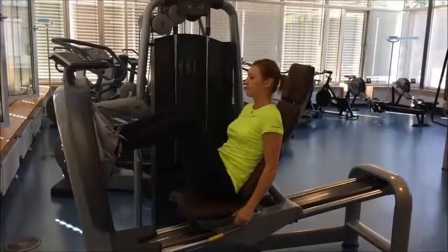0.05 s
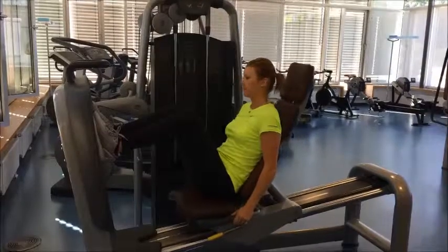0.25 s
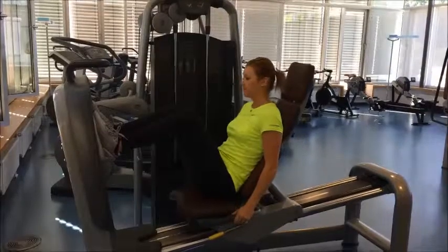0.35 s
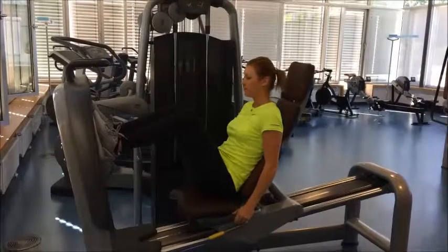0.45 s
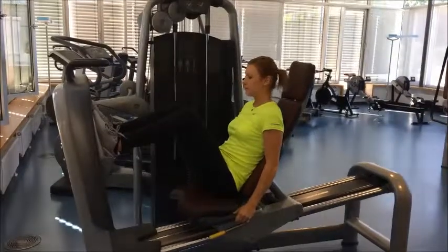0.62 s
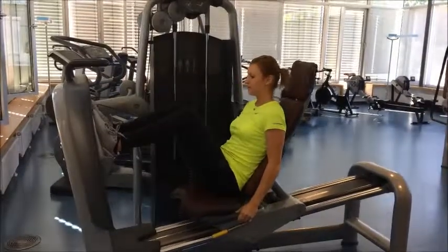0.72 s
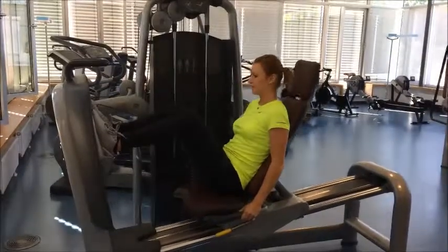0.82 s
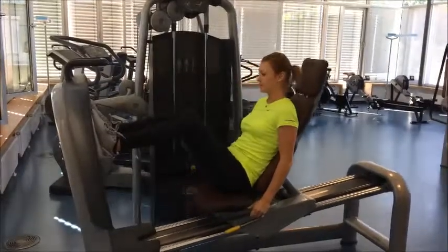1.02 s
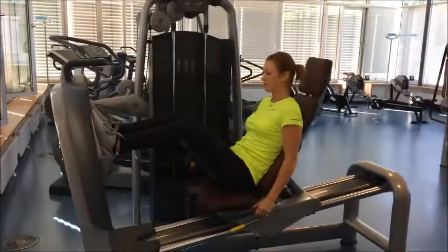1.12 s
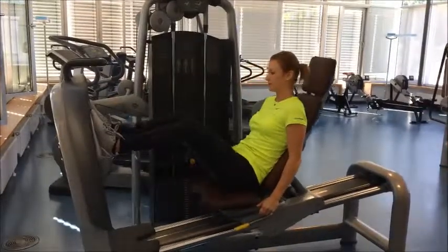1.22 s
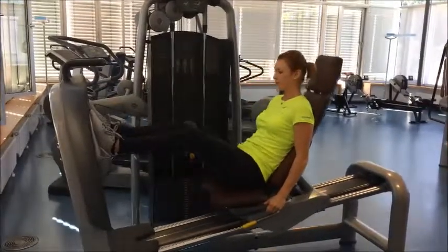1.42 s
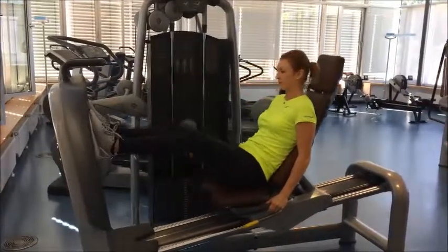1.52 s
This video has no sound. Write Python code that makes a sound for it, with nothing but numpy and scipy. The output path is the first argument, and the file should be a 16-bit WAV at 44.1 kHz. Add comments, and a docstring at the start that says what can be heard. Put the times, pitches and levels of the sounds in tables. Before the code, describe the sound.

Steel weight plates clank and ring on a leg press machine in a reverberant gym hall

```python
"""A leg press in a gym hall, in mono: low room rumble and the seat carriage on its rails are there from the start,
both made of coloured noise. The weight stack is then picked up with a clattering clank and knocks on: damped sines
ring the steel plates, noise and sines rattle the frame, and noise bursts crack. The housing booms in low modes,
a small steel part pings, and the hall answers with noise tails. Late on, the rolling swells and the carriage
bumps softly. The microphone path thins the deep bass and stops the extreme treble."""
import sys
import numpy as np
from scipy import signal
from scipy.fft import rfft, irfft, next_fast_len
from scipy.io import wavfile
from scipy.ndimage import uniform_filter1d

SR = 44100
rng = np.random.default_rng(int(sys.argv[2]) if len(sys.argv) > 2 else 0)


def int16_out(signal):
    """Quantize to a 16-bit WAV file."""
    q = np.round(np.clip(np.atleast_2d(signal).T, -1, 1) * 32767)
    wavfile.write(sys.argv[1], SR, q.astype(np.int16))


N = 68355


def amp(db):
    """Decibels to gain."""
    return 10 ** (np.asarray(db) / 20)


def unit(x):
    """Scale to rms 1."""
    return x / np.sqrt(np.mean(x ** 2) + 1e-20)


def along(points, hz):
    """Read (f/Hz, value) points at hz, on a log frequency axis."""
    f, value = np.transpose(points)
    return np.interp(np.log(hz + 1), np.log(f + 1), value)


def clock():
    """Time of every sample, in seconds."""
    return np.arange(N) / SR


def delayed(x, s):
    """x starting at time s."""
    return np.pad(x, (max(round(s * SR), 0), 0))[:N]


def filtered(x, response):
    """x with its spectrum multiplied by a response of frequency."""
    size = next_fast_len(N + SR // 2)
    spectrum = rfft(x, size) * response(np.fft.rfftfreq(size, 1 / SR))
    return irfft(spectrum, size)[:N]


def noise(spectrum):
    """Coloured noise of rms 1."""
    white = rng.standard_normal(N)
    return unit(filtered(white, lambda hz: amp(along(spectrum, hz))))


def fade(t, t60):
    """Exponential decay, 60 dB in t60 seconds."""
    return np.exp(-np.log(1000) * t / np.maximum(t60, 1e-3))


def onset(rise_s):
    """Smooth exponential rise from silence with time constant rise_s."""
    return 1 - np.exp(-clock() / rise_s)


def dying(x, t60s):
    """Let each frequency of x die at its own speed."""
    hz, t, bins = signal.stft(x, SR, nperseg=256)
    bins = bins * fade(t, along(t60s, hz)[:, None])
    return signal.istft(bins, SR, nperseg=256)[1][:N]


def mode(hz, t60, blur_hz):
    """One damped sine whose phase wanders smoothly, widening its line to blur_hz."""
    t = clock()
    steps = uniform_filter1d(np.cumsum(rng.standard_normal(N)), size=24)
    wander = steps * np.sqrt(2 * np.pi * abs(blur_hz) / SR)
    return np.sin(2 * np.pi * (hz * t + rng.random()) + wander) * fade(t, t60)


def modes(table, blur_hz):
    """Sum of the damped sines in a table of (f/Hz, level/dB, t60/s)."""
    return sum(amp(db) * mode(hz, t60, blur_hz) for hz, db, t60 in table)


# Colour of the room rumble: (f/Hz, relative level/dB)
ROOM_COLOUR = [(15, -38), (25, -79), (52, -0.5), (93, -3), (160, 0.5), (267, -14), (648, -19.5), (919, -18),
               (1620, -25.5), (1800, -21.5), (2840, -32), (14300, -49.5), (15500, -44)]
ROOM_DB = -57
DRONE_HZ, DRONE_WIDTH_HZ, DRONE_DB = 167.7, 23, -55


def room():
    """Steady broadband rumble, plus noise through one narrow low resonance, which wavers."""
    def resonance(f):
        damping = 1j * f * DRONE_WIDTH_HZ
        return damping / (DRONE_HZ ** 2 - f ** 2 + damping)

    rumble = amp(ROOM_DB) * noise(ROOM_COLOUR)
    drone = unit(filtered(rng.standard_normal(N), resonance))
    return rumble + amp(DRONE_DB) * drone


# Loudness of the carriage rolling: (t/s, level/dB)
ROLL_LEVEL = [(0, -61), (.7, -62.5), (1.0, -58), (1.28, -57.5), (1.55, -60.5)]
# Colour of rollers on the rails: (f/Hz, relative level/dB)
RAIL_COLOUR = [(40, 15), (120, -11.5), (330, 7), (550, -2), (900, 0.5), (1700, -6), (3000, -28),
               (6000, -38), (15000, -32)]
# Soft bumps of the carriage: (t/s, level/dB)
BUMPS = [(1.25, -60.5)]
# Colour of a bump: (f/Hz, relative level/dB)
BUMP_COLOUR = [(200, -8), (2300, 11), (4200, 1), (8000, -23), (15000, -33)]
BUMP_RISE_S, BUMP_T60_S = .004, 0.11


def carriage():
    """Rollers rumble on the rails as noise of changing level, with a soft bump."""
    t = clock()
    out = amp(np.interp(t, *np.transpose(ROLL_LEVEL))) * noise(RAIL_COLOUR)
    envelope = onset(BUMP_RISE_S) * fade(t, BUMP_T60_S)
    for s, db in BUMPS:
        out += amp(db) * delayed(envelope * noise(BUMP_COLOUR), s)
    return out


# Reverberation time of the hall: (f/Hz, t60/s)
HALL_T60 = [(100, 1.93), (500, 0.68), (2500, 0.91), (6000, 0.68), (10500, 0.49), (14500, 0.57)]


def in_hall(x, wet_db):
    """The direct sound plus a fresh reverberant tail of decaying noise."""
    tail = dying(rng.standard_normal(N), HALL_T60)
    tail = tail / np.linalg.norm(tail)
    return x + amp(wet_db) * signal.fftconvolve(x, tail)[:N]


# Plate modes, before each contact's own tilt and damping: (f/Hz, level/dB, free t60/s)
PLATE_MODES = [(1477.7, 1, 0.75), (1509, -9.5, 0.52), (1588, -8, 0.44), (1810, -12.5, 0.59),
               (2170, -2.5, 0.27), (2316, -6, 0.47), (2305, -1, 0.71), (2309, -7.5, 0.72), (2632, -8, 0.51),
               (2857, -13.5, 0.33), (3636, -14, 0.81), (4347, -9.5, 0.71), (5330, -14.5, 0.67),
               (5870, -1, 0.21), (6572, -11, .6), (6670, -8.5, 0.35), (7310, -9.5, 0.26), (9500, -14, 0.3),
               (10720, -14, 0.44)]
# Pitches at which each contact sets its ring level: low, middle, high (f/Hz)
RING_BANDS_HZ = [1470, 2320, 5880]
PLATE_DETUNE = .007  # spread of the neighbour's pitch, as a share
PLATE_SCATTER_DB, NEIGHBOUR_DB, PLATE_BLUR_HZ = .5, -5, 8
CLANG_T60_S, CLANG_BLUR_HZ = 0.067, 109  # a harsher ring while the plates still chatter
ROCK_PER_S, ROCK_DEPTH = 18.1, 0.35  # the struck plates rock, so their ring pulses
RING_ATTACK_S = 0.00064


def plates(band_db, clang_db, length):
    """A brief clang, then the struck plate and a slightly detuned neighbour ring and beat."""
    ring = np.zeros(N)
    rock = 1 - np.clip(ROCK_DEPTH, 0, 1) * np.cos(2 * np.pi * ROCK_PER_S * clock())
    for hz, db, t60 in PLATE_MODES:
        tilt_db = np.interp(np.log(hz), np.log(RING_BANDS_HZ), band_db)
        level_db = db + tilt_db + PLATE_SCATTER_DB * rng.standard_normal()
        struck = mode(hz, t60 * length, PLATE_BLUR_HZ)
        neighbour_hz = hz * (1 + PLATE_DETUNE * rng.standard_normal())
        neighbour = mode(neighbour_hz, t60 * length, PLATE_BLUR_HZ)
        clang = mode(hz, CLANG_T60_S, CLANG_BLUR_HZ)
        pulsing = rock * (struck + amp(NEIGHBOUR_DB) * neighbour)
        ring += amp(level_db) * (pulsing + amp(clang_db) * clang)
    return ring * onset(RING_ATTACK_S)


# The frame's dense rattle: colour (f/Hz, relative level/dB), then decay (f/Hz, t60/s)
FRAME_COLOUR = [(200, -21.5), (330, -7), (430, 1), (540, -24.5), (700, -2), (1100, 4.5), (1320, -15),
                (1600, -2), (1900, -10.5), (2300, -12), (3000, -24.5), (4400, -23), (8000, -28),
                (15000, -27)]
FRAME_T60 = [(300, 0.24), (1000, 0.13), (2500, 0.32), (8000, 0.15)]
# The frame's clearest modes: (f/Hz, level/dB, t60/s)
FRAME_MODES = [(552.2, -22.5, 0.59), (687.8, -14.5, 0.38), (738, -18, 0.89), (949, -15.5, 0.67),
               (1044, -17, 0.76), (1124, -13.5, 0.36), (1174, -14.5, 0.46)]
FRAME_BLUR_HZ = 6.3


def frame():
    """A short dense rattle of noise over a few ringing modes."""
    return dying(noise(FRAME_COLOUR), FRAME_T60) + modes(FRAME_MODES, FRAME_BLUR_HZ)


# The crack of steel on steel: colour (f/Hz, relative level/dB), then decay (f/Hz, t60/s)
CRACK_COLOUR = [(300, -18), (2000, 19.5), (3200, -1), (6000, -1.5), (8500, -3.5), (10500, -1), (14000, -8),
                (15500, -8)]
CRACK_T60 = [(1000, 0.18), (6000, 0.27), (15000, 0.17)]


def crack():
    """Steel on steel: a noise burst whose frequencies die at their own speeds."""
    return dying(noise(CRACK_COLOUR), CRACK_T60)


# Contacts in the stack, before the overall STACK_DB: (t/s, ring level/dB at low, middle and high pitch,
# clang over ring/dB, ring length as a share of the free t60, frame level/dB, crack level/dB)
CONTACTS = [(.2222, -49, -36, -40, -8.5, .8, -31, -37.5), (0.2344, -36, -38, -47.5, -11, 1, -23.5, -51),
            (.2440, -30, -38, -38, 6, .6, -20.5, -36), (.2540, -25, -34, -31.5, 5, 0.4, -32, -42),
            (.2955, -38, -35.5, -44, 7, 1, -42, -69), (.3848, -43.5, -37, -35, 6.5, 0.75, -45.5, -27),
            (.3974, -32.5, -26.5, -39, 5.5, 0.76, -37, -50), (.4680, -45.5, -44.5, -74, -9, 0.55, -42, -80),
            (.5730, -36, -71, -81, -30, 0.37, -47, -90)]
STACK_DB = -4
RING_WET_DB, RATTLE_WET_DB, CRACK_WET_DB = -9, -4, -7.5  # hall tail over direct sound


def stack():
    """Every contact gives a ring of the plates, a rattle of the frame and a crack."""
    out = np.zeros(N)
    for s, low_db, mid_db, high_db, clang_db, length, frame_db, crack_db in CONTACTS:
        ring = in_hall(plates([low_db, mid_db, high_db], clang_db, length), RING_WET_DB)
        rattle = in_hall(amp(frame_db) * frame(), RATTLE_WET_DB)
        snap = in_hall(amp(crack_db) * crack(), CRACK_WET_DB)
        out += delayed(ring + rattle + snap, s)
    return amp(STACK_DB) * out


# Shoves on the housing: (t/s, level/dB)
SHOVES = [(.2260, -32.5), (.2370, -33.5), (.3420, -36.5), (.3920, -41)]
# Housing modes: (f/Hz, level/dB, t60/s)
HOUSING_MODES = [(82.2, -15.5, 1.8), (93, -3, 0.31), (121.1, -7, 0.79), (156.2, -2, 1.32),
                 (173.1, -1, 0.29)]
# Colour of the dull push under the boom: (f/Hz, relative level/dB)
PUSH_COLOUR = [(25, -35), (45, -13), (70, -3), (120, -0.5), (180, -1), (300, -25.5), (700, -42),
               (3000, -90)]
PUSH_DB, PUSH_T60_S = 5, 0.088
HOUSING_BLUR_HZ, SHOVE_ATTACK_S, SHOVE_WET_DB = 4.8, 0.0031, -9


def housing():
    """Taking the load, the housing booms in low modes over a thump of dull noise."""
    out = np.zeros(N)
    for s, shove_db in SHOVES:
        boom = modes(HOUSING_MODES, HOUSING_BLUR_HZ)
        push = amp(PUSH_DB) * noise(PUSH_COLOUR) * fade(clock(), PUSH_T60_S)
        out += amp(shove_db) * delayed((boom + push) * onset(SHOVE_ATTACK_S), s)
    return in_hall(out, SHOVE_WET_DB)


# Pings of a small part, such as the selector pin: (t/s, level/dB)
PINGS = [(0.3009, -37), (0.3972, -38)]
# Modes of that part: (f/Hz, level/dB, t60/s)
PIN_MODES = [(2680, -1.5, 0.3), (5880, 2, 0.17)]
PIN_BLUR_HZ, PIN_WET_DB = 3.2, -16.5


def pin():
    """A small steel part pings clear and high, in two damped modes with the plates' fast attack."""
    out = np.zeros(N)
    for s, db in PINGS:
        ping = modes(PIN_MODES, PIN_BLUR_HZ) * onset(RING_ATTACK_S)
        out += amp(db) * delayed(ping, s)
    return in_hall(out, PIN_WET_DB)


def scene():
    """The machine in its hall, in mono."""
    return (stack() + pin() + housing() + carriage() + room())[None]


LOW_CUT_HZ, TOP_HZ = 38, 15450  # each the point of half amplitude


def record(dry):
    """The camera's microphone path thins the deep bass and cuts steeply above its band limit."""
    def response(hz):
        bass_cut = hz ** 2 / (hz ** 2 + LOW_CUT_HZ ** 2)
        return bass_cut / (1 + (hz / TOP_HZ) ** 200)

    return np.array([filtered(x, response) for x in dry])


dry = scene()
out = record(dry)
int16_out(out)
```